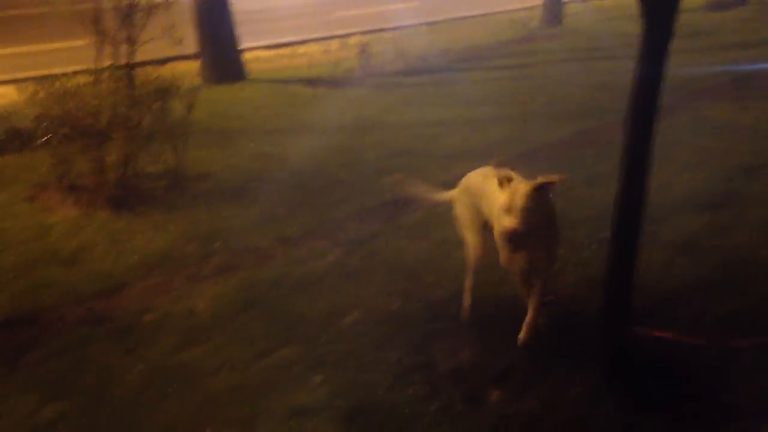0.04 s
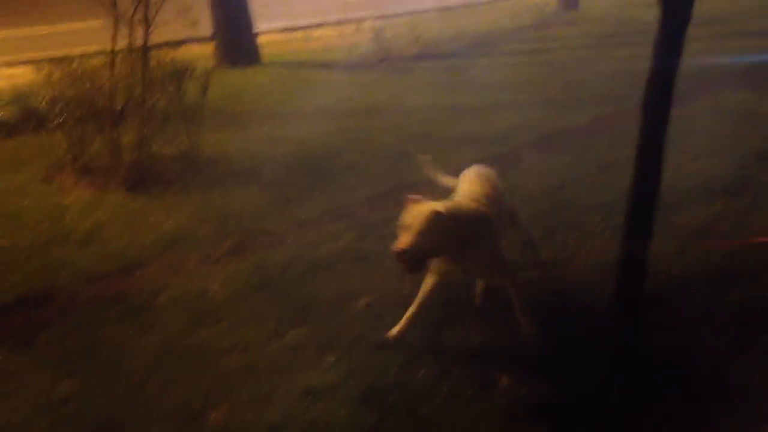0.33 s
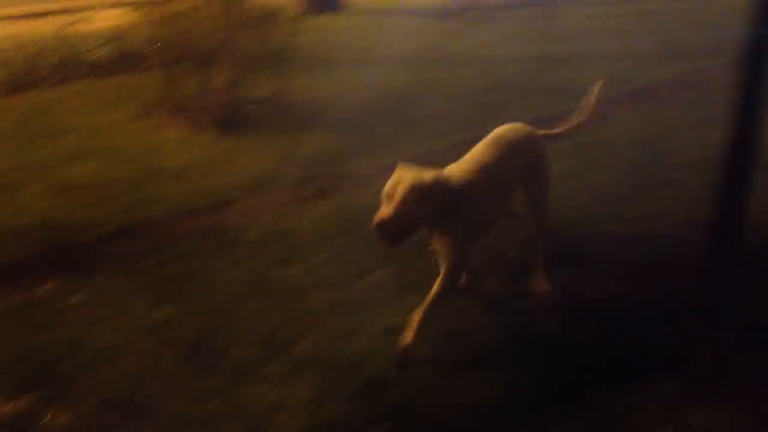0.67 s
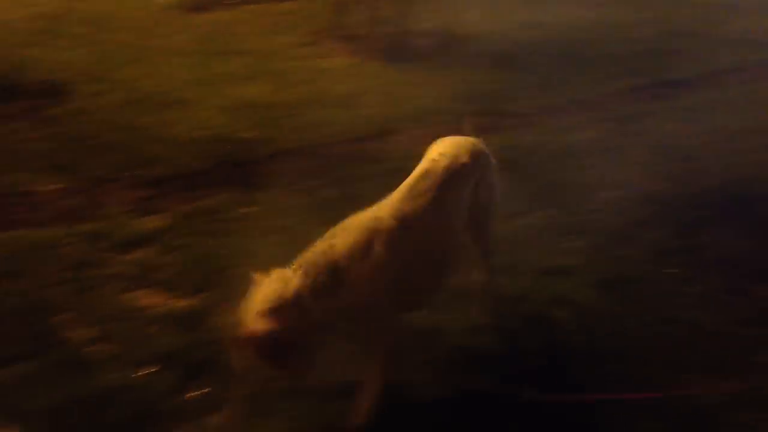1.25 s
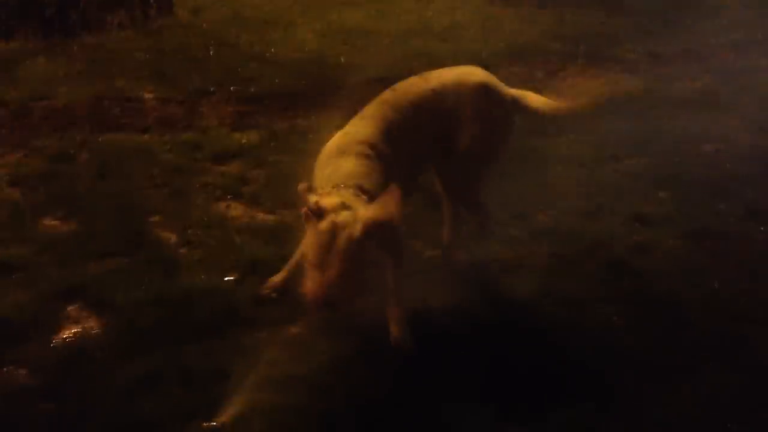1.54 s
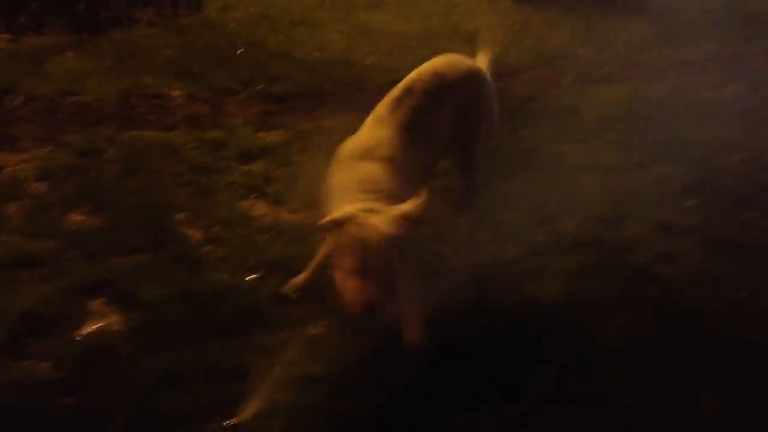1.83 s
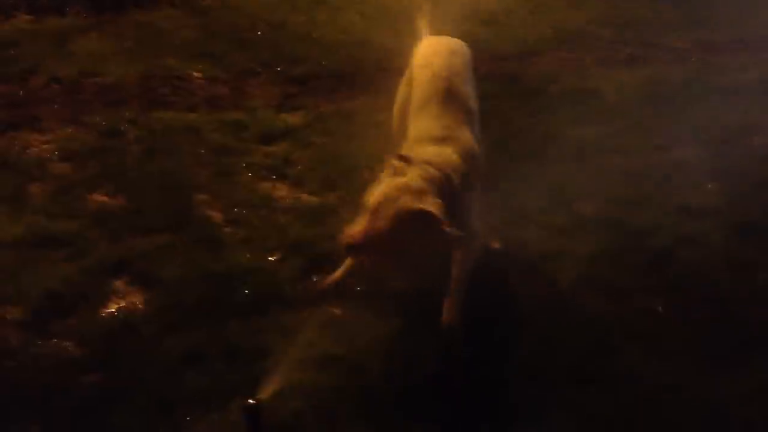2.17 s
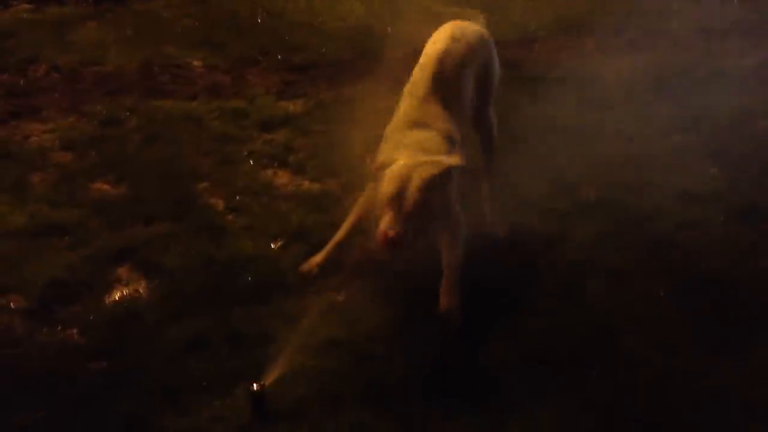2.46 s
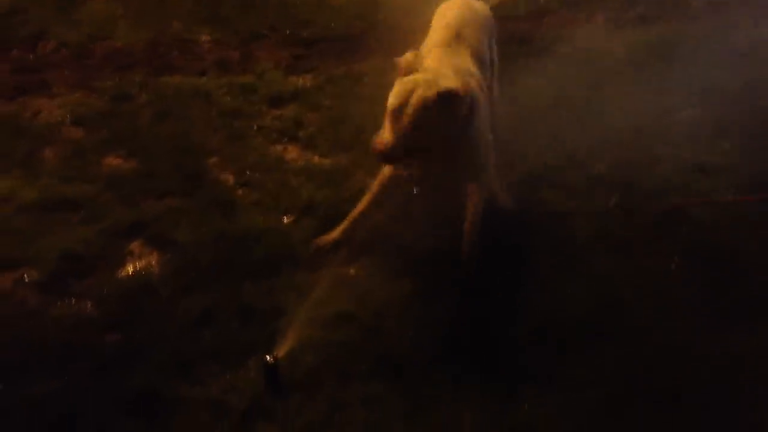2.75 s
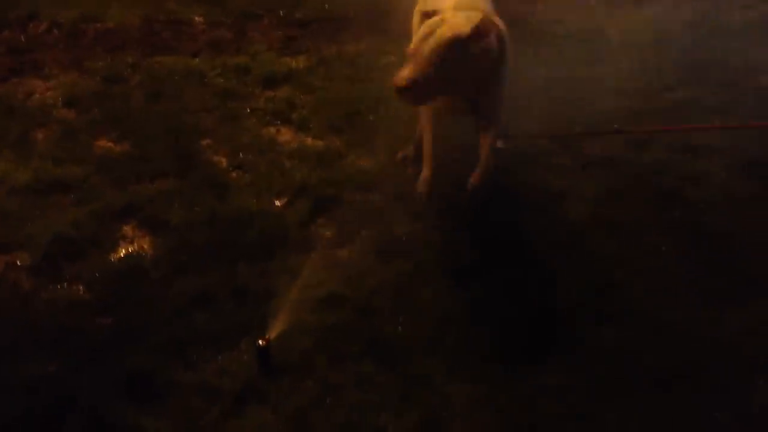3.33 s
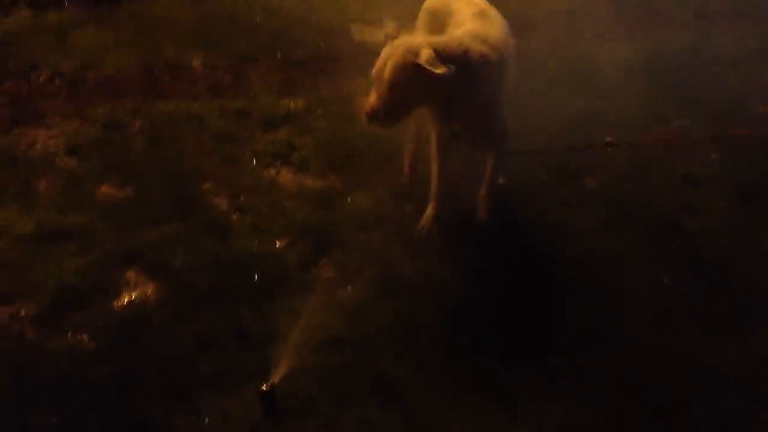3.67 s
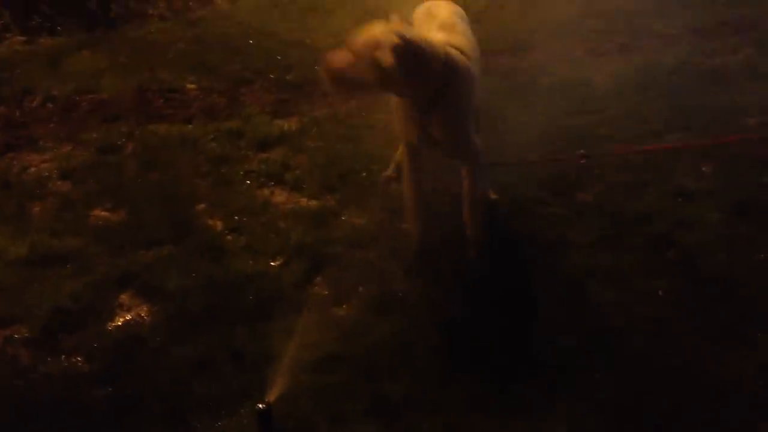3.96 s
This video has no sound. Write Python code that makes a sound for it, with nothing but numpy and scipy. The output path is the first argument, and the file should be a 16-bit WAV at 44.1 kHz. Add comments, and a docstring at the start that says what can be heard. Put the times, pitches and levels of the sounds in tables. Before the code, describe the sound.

A lawn sprinkler sprays throughout with a rushing hiss and low flutter, growing gradually louder over four seconds as it gets closer. From about 1.1 seconds, drops patter on grass and a dog bites at the jet, making quick, bright splashes, strongest around 1.4, 1.7 and 3.5 seconds. A few short hollow swells with soft thuds come through, clearest near 2.2 and 3.5 seconds. Distant traffic hums very faintly.

```python
"""A lawn sprinkler sprays at night, its nozzle swelling as the listener walks slowly towards it. The nozzle
roars and its jet flutters; mist hisses and drops patter on the grass. A dog bites at the jet: water splashes
off muzzle and coat in bright bursts, rings in the open jaws and drums dully on its body. Traffic rumbles far
away."""
import sys
import numpy as np
from scipy import signal
from scipy.fft import rfft, irfft
from scipy.io import wavfile
from scipy.ndimage import map_coordinates

SR = 44100
rng = np.random.default_rng(int(sys.argv[2]) if len(sys.argv) > 2 else 0)


def inscribe(sig):
    """Save sig as 16-bit PCM at rate SR to the path in sys.argv[1].

    A 1-D sig is mono; a 2-D sig holds one channel per row.
    Samples are clipped to [-1, 1] before scaling.
    """
    pcm = np.round(np.clip(np.atleast_2d(sig).T, -1, 1) * 32767)
    wavfile.write(sys.argv[1], SR, pcm.astype(np.int16))


N = 176400

# The nozzle's swell on the walk towards it. Each row: time in seconds, level in dB.
NOZZLE_LEVEL = [(0, -39.5), (.55, -36.3), (.84, -36.5), (.98, -34.5), (1.17, -34.5), (1.5, -34),
                (1.9, -33.5), (2.35, -32.5), (2.7, -31.5), (2.84, -31), (3.25, -30.5), (3.6, -30), (4, -29)]
# Tone of each water layer. Each row: frequency in Hz, relative level in dB.
ROAR_SPECTRUM = [(50, -65), (250, -58), (420, -15.5), (560, -11), (700, -5), (900, -4), (1050, -1),
                 (1250, -2.5), (1650, -2), (1950, -6), (2300, -15), (2800, -26), (5000, -35.5)]
FLUTTER_SPECTRUM = [(30, -52), (42, -39), (55, -25), (80, -24), (115, -9), (155, -2), (185, -3), (208, 1.5),
                    (228, -0.5), (280, -1.5), (350, -8), (450, -18.5), (900, -33)]
MIST_SPECTRUM = [(100, -21), (500, 5), (2300, 5), (3000, 2.5), (3600, -2.5), (4350, 2.5), (5200, 0),
                 (5900, 4), (6700, 0), (8400, -0.5), (9300, -.5), (10400, -3), (11400, -3.5), (12200, -1.5),
                 (14000, 1), (15000, 1)]
PATTER_SPECTRUM = [(2000, -23), (3000, -6), (3800, 0.5), (4300, 1.5), (5000, 1), (5700, -7.5), (6200, -9.5),
                   (7000, -5.5), (7800, -12), (9400, -8), (12000, -9), (14500, -8), (15500, -5.5)]
COAT_SPLASH_SPECTRUM = [(2000, -17), (3200, -4), (4800, 4.5), (5600, 2), (6300, -1.5), (7200, 0),
                        (8200, 2.5), (9600, -1), (11200, 3.5), (12500, -1.5), (14500, 0.5), (15500, 4.5)]
FINE_SPRAY_SPECTRUM = [(3000, -44), (6000, -14), (7050, -3), (7700, -12), (9300, 4.5), (10700, -3),
                       (11900, -18), (13300, 5), (14300, 5), (15500, 3.5)]
# Airborne mist, which the dog shields later on. Each row: time in seconds, level in dB.
MIST_LEVEL = [(0, -41), (1.15, -41.5), (2, -41.5), (3.2, -43), (3.4, -46), (3.52, -44), (4, -41.5)]
# Patter on wet grass and legs. Each row: time in seconds, level in dB.
PATTER_LEVEL = [(0, -64), (.8, -53), (1.12, -44), (1.3, -44.5), (1.55, -36), (1.69, -43.5), (1.85, -35),
                (2.12, -36.5), (2.25, -42.5), (2.48, -37.5), (2.64, -39), (2.92, -36.5), (3.0, -40),
                (3.15, -37), (3.4, -40.5), (3.62, -37), (3.8, -38.5), (3.94, -34), (4, -36)]
# The mist's reflection trails its direct sound. Each row: time in seconds, lag in milliseconds.
REFLECTION_LAG = [(0, 0.24), (.7, 0.23), (1.2, 0.24), (4, 0.313)]
# A sinking notch in the hiss. Each row: time in seconds, centre in Hz.
NOTCH_CENTRE = [(0, 6620), (1.1, 6650), (1.62, 6270), (2.15, 6300), (2.6, 6020), (4, 6000)]
# The dog breaks the jet. Each row: start and length in seconds, then levels in dB of
# coat splash, fine spray and jaw ring.
BITES = [(1.13, 0.096, -39.5, -48, -58), (1.182, 0.1, -37, -48, -53), (1.28, 0.099, -35, -48, -50),
         (1.338, 0.12, -28.5, -46, -31.5), (1.45, 0.043, -30, -50, -40), (1.582, 0.063, -35.5, -36, -55),
         (1.697, 0.098, -30.5, -38, -44), (1.79, 0.044, -38, -48, -47), (2.047, 0.065, -52, -55, -45),
         (2.17, 0.22, -41.5, -41.5, -51), (2.33, 0.089, -36.5, -37, -44), (2.397, 0.072, -37, -40, -40.5),
         (2.474, 0.16, -41, -38.5, -57), (2.663, 0.058, -38, -38, -42), (2.743, 0.066, -49, -37, -59),
         (2.865, 0.068, -41, -40, -50), (3.02, 0.069, -41, -36, -42), (3.095, .19, -45, -43, -62),
         (3.438, 0.076, -38.5, -34, -48), (3.505, 0.081, -39, -29.5, -54), (3.6, 0.099, -50, -37.5, -55),
         (3.71, .28, -55, -44, -51)]
# Resonances of the open jaws. Each row: pitch in Hz, width in Hz, relative level in dB.
JAW_RESONANCES = [(3640, 280, -2.5), (4360, 400, 3.5), (5260, 660, 6), (7170, 440, 1)]
# The jet drums on the dog's body. Each row: peak in seconds, hollow pitch in Hz, hollow and thud in dB.
BODY_HITS = [(.92, 1060, -39, -59), (1.585, 1040, -38, -44), (2.17, 1070, -34.5, -41),
             (2.86, 950, -35, -46), (2.975, 960, -35.5, -57), (3.085, 1000, -44, -40),
             (3.536, 797, -31, -36)]
# The far road. Each row: time in seconds, level in dB.
TRAFFIC_LEVEL = [(0, -66), (1.6, -82), (2.2, -69.5), (4, -68)]


def sprinkler_nozzle():
    """The nozzle's roar, its faint hollow ring and the jet's low flutter swell together as it nears."""
    roar = undb(-0.02) * colour(noise(), ROAR_SPECTRUM) * waver(rate_hz=35, depth_db=.5)
    hollow = undb(-13) * ring(noise(), hz=1009, width_hz=82) * waver(rate_hz=11, depth_db=2.5)
    flutter = undb(-9.5) * colour(noise(), FLUTTER_SPECTRUM) * waver(rate_hz=20, depth_db=1)
    return curve(NOZZLE_LEVEL) * (roar + hollow + flutter)


def falling_water():
    """An even bed of mist, with heavier drops pattering close by."""
    mist = early_reflection(colour(drops(share=.26), MIST_SPECTRUM))
    patter = colour(drops(share=.55), PATTER_SPECTRUM) * waver(rate_hz=70, depth_db=1.28)
    return curve(MIST_LEVEL) * mist + curve(PATTER_LEVEL) * patter


def drops(share, per_second=5500, spread_db=4.5):
    """Drops of uneven size tick over smooth hiss; their share of the power sets the grain."""
    ticks = (rng.random(N) < per_second / SR) * np.sign(noise())
    sizes = undb(spread_db * np.minimum(noise(), 2.5))
    return np.sqrt(share) * unit(ticks * sizes) + np.sqrt(1 - share) * noise()


def early_reflection(x, gain=.24):
    """One reflection combs the hiss; its growing lag slides the hollows downwards."""
    lag_samples = glide(REFLECTION_LAG) * SR / 1000
    reflection = map_coordinates(x, [np.arange(N) - lag_samples], order=5, mode="mirror")
    return unit(x + gain * reflection)


def sinking_notch(x, width_hz=370, depth=.41):
    """A narrow dip in the spray's hiss sinks as the listener moves."""
    carrier = np.exp(2j * np.pi * np.cumsum(glide(NOTCH_CENTRE)) / SR)
    lowpass = signal.butter(1, width_hz / 2, fs=SR, output="sos")
    band = signal.sosfiltfilt(lowpass, x / carrier, padtype=None)  # shifted down to 0 Hz and isolated
    return x - depth * 2 * np.real(band * carrier)


def dog_bites(attack_s=.045, release_s=.035):
    """Each bite at the jet throws drops against the coat, sheds fine spray and rings the open jaws."""
    t = np.arange(N) / SR
    jaws = unit(sum(undb(db) * ring(drops(share=.18), hz, width) for hz, width, db in JAW_RESONANCES))
    coat_splash = colour(drops(share=.4), COAT_SPLASH_SPECTRUM)
    fine_spray = colour(drops(share=.58), FINE_SPRAY_SPECTRUM)
    layers = np.array([coat_splash, fine_spray, jaws])
    power = np.zeros((3, N))  # overlapping bites add in power
    for start, length, *levels_db in BITES:
        attack = np.clip((t - start) / attack_s, 0, 1)
        release = np.exp(-np.maximum(t - start - length, 0) / release_s)
        power += np.outer(undb(levels_db), attack * release) ** 2
    return (np.sqrt(power) * layers).sum(axis=0) * waver(rate_hz=90, depth_db=.5)


def body_drumming(swell_s=.031):
    """Short hollow knocks as the jet drums dully on the dog's body, each with a low thud of its own."""
    t = np.arange(N) / SR
    out = np.zeros(N)
    for peak, hz, hollow_db, thud_db in BODY_HITS:
        hollow = undb(hollow_db) * ring(noise(), hz, width_hz=290)
        thud = undb(thud_db) * ring(noise(), hz=219, width_hz=96)
        out += (hollow + thud) * np.exp(-.5 * ((t - peak) / swell_s) ** 2)
    return out


def distant_traffic():
    """A faint low engine drone from the road."""
    return curve(TRAFFIC_LEVEL) * ring(noise(), hz=71.6, width_hz=4.8)


def undb(db):
    """Decibels to gain."""
    return 10 ** (np.asarray(db) / 20)


def unit(x):
    """Scale to rms 1."""
    return x / np.sqrt(np.mean(x ** 2))


def glide(points):
    """Straight ramps through (seconds, value) points."""
    return np.interp(np.arange(N) / SR, *np.array(points).T)


def curve(points):
    """A fader ride through (seconds, dB) points, as gain."""
    return undb(glide(points))


def colour(x, points):
    """Equalise x along (Hz, dB) points, at rms 1."""
    hz, db = np.array(points).T
    f = np.maximum(np.fft.rfftfreq(N, 1 / SR), 1)
    gain = undb(np.interp(np.log(f), np.log(hz), db))
    return unit(irfft(rfft(x) * gain, N))


def ring(x, hz, width_hz):
    """A steep resonance, width_hz wide at 6 dB down, at rms 1."""
    f = np.maximum(np.fft.rfftfreq(N, 1 / SR), 1)
    detuning = hz / width_hz * (f / hz - hz / f)
    return unit(irfft(rfft(x) / (1 + 1j * detuning) ** 2, N))


def noise():
    """White noise."""
    return rng.standard_normal(N)


def waver(rate_hz, depth_db):
    """A gain that wanders smoothly at random."""
    steps = rng.standard_normal(1024)
    return undb(depth_db * map_coordinates(steps, [np.arange(N) / SR * rate_hz], order=2, mode="mirror"))


def scene():
    """Sprinkler and dog in front, traffic far behind, in mono."""
    nozzle = sprinkler_nozzle()
    spray = sinking_notch(falling_water() + dog_bites())
    return (nozzle + spray + body_drumming() + distant_traffic())[None]


def record(dry, low_cut_hz=48, top_hz=15280):
    """Thin the deepest bass and cut the top steeply."""
    thinned = signal.sosfilt(signal.butter(4, low_cut_hz, "high", fs=SR, output="sos"), dry)
    return signal.fftconvolve(thinned, signal.firwin(1601, top_hz, fs=SR)[None], "same")


dry = scene()
out = record(dry)
inscribe(out)
```